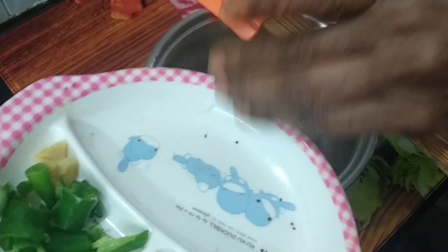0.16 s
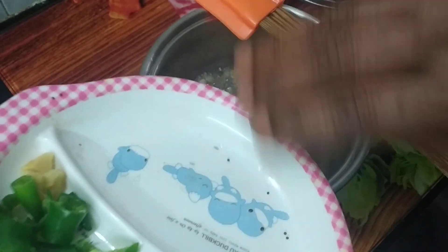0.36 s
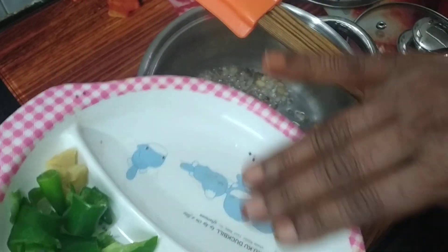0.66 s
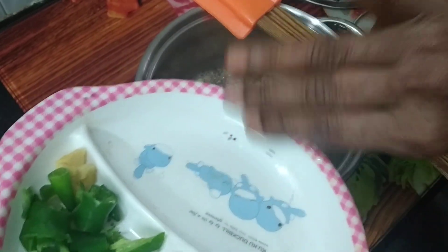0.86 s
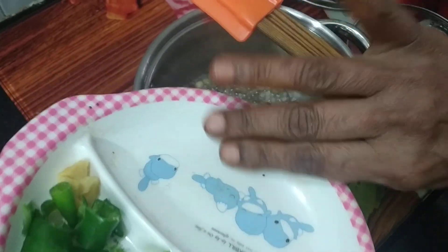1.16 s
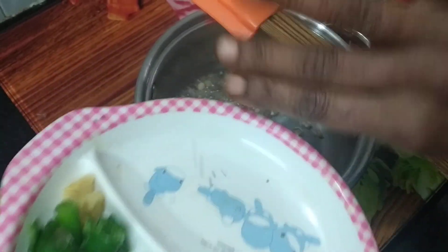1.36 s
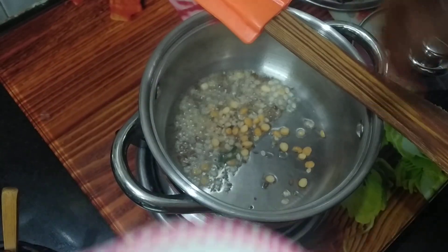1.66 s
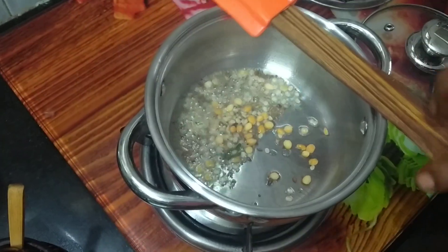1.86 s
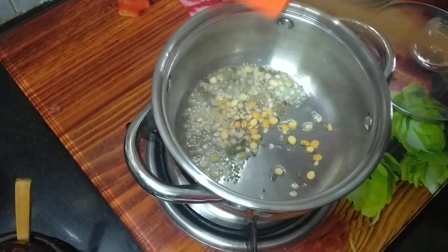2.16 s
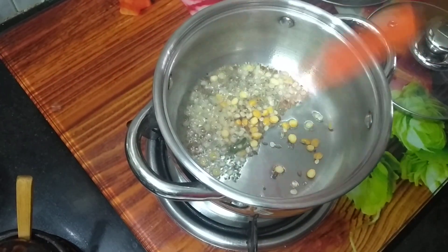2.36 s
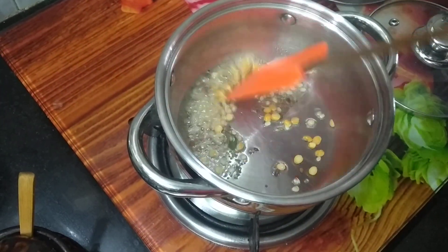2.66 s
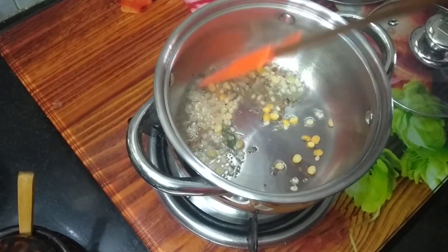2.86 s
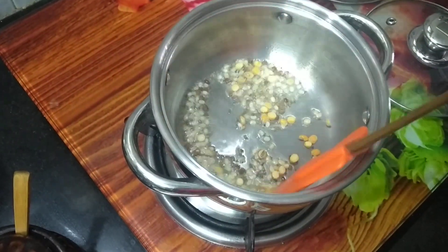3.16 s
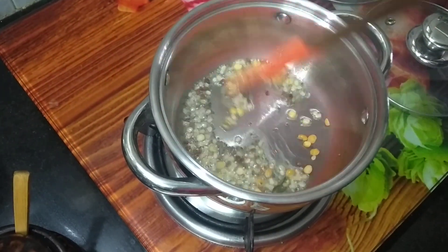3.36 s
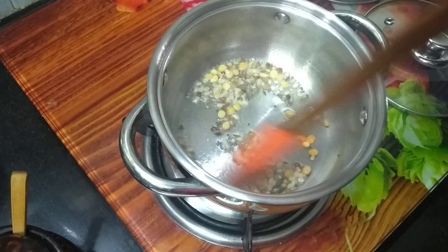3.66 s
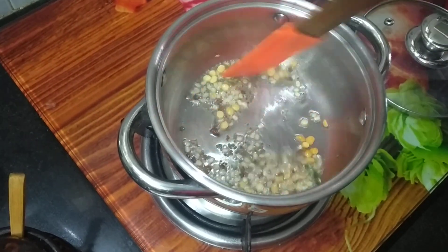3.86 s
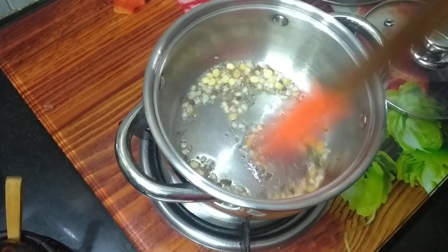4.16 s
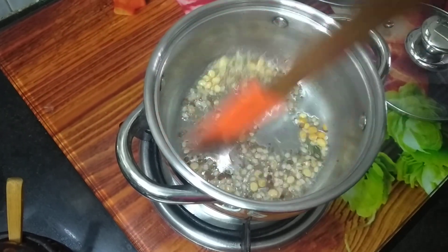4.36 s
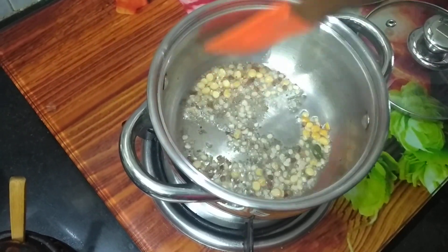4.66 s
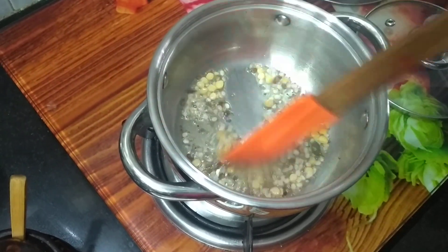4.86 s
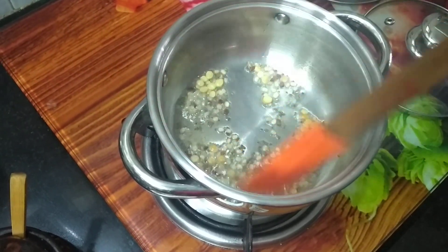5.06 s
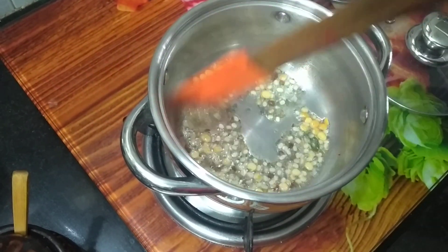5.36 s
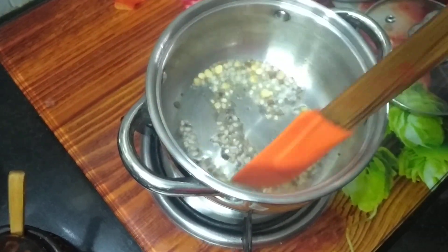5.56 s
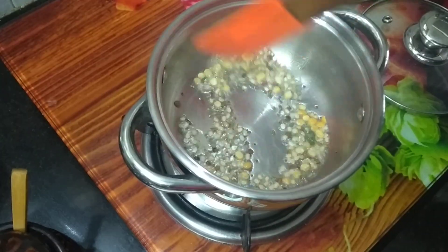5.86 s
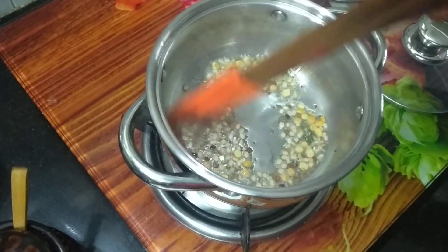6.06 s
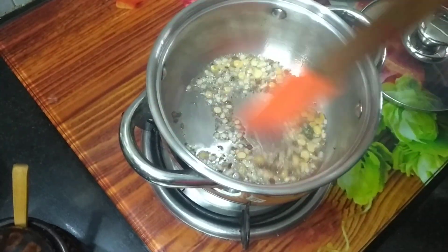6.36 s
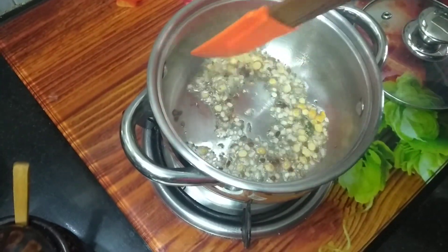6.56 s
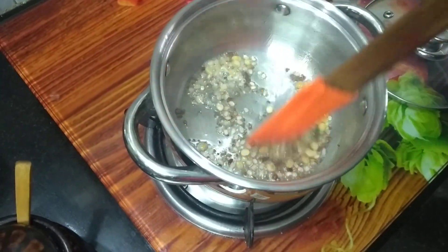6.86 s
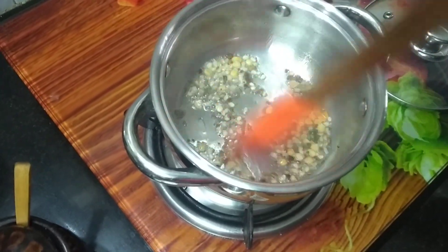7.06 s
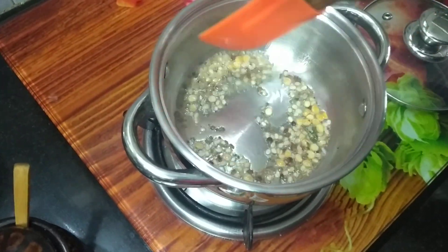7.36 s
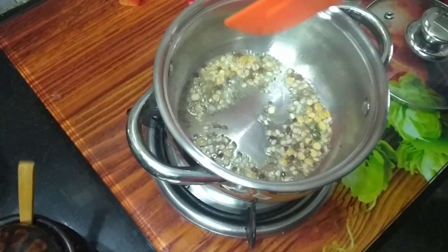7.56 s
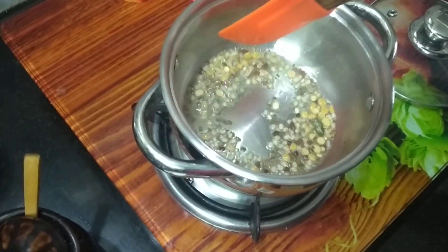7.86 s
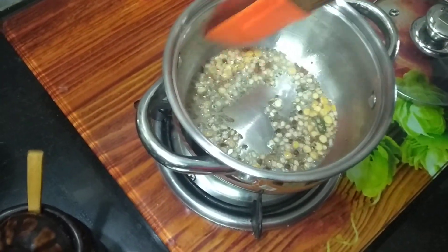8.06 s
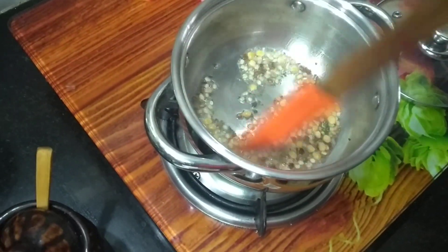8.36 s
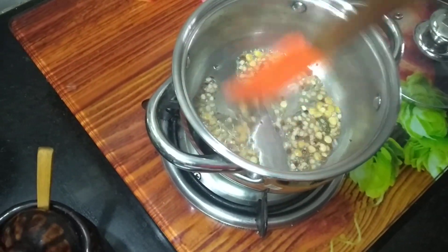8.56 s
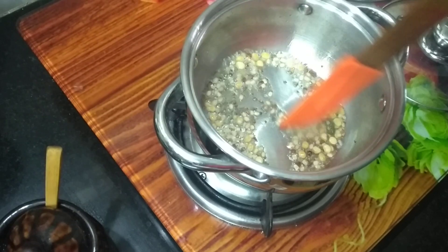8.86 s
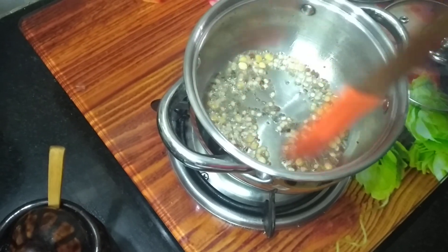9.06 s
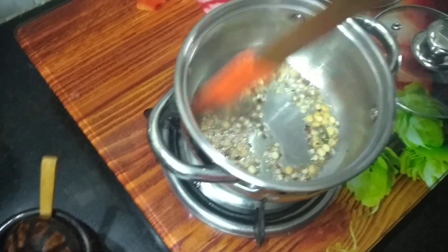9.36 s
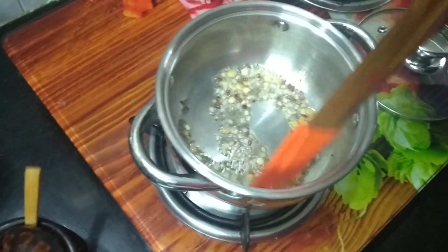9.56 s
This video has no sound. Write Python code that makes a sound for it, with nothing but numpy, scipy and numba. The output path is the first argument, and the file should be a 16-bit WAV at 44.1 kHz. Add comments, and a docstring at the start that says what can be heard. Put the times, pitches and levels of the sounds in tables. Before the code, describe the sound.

Seeds and lentils sizzle in hot oil in a steel pot, popping sharply and often while a spatula scrapes and knocks the metal.

```python
"""Seeds frying in a steel pot

Hot oil fizzes as dense random clicks and short pings; seeds burst as shaped noise cracks with a hissing tail.
A spatula scrapes the base in stick-slip clicks and knocks the wall, ringing the steel modes; loose seeds patter.
A plate squeaks once as a wavering tone, and a gas flame rumbles as low noise in the small hard-walled kitchen.
The microphones are close: gain control ducks after loud peaks, and the hardest cracks overload the input."""
import sys
import numpy as np
from scipy import signal
from scipy.fft import rfft, irfft
from scipy.io import wavfile
from scipy.ndimage import uniform_filter1d
from numba import njit

SR = 44100
rng = np.random.default_rng(int(sys.argv[2]) if len(sys.argv) > 2 else 0)


def dump(signal):
    """Clip the signal to [-1, 1] and save it as 16-bit WAV at the path in sys.argv[1]."""
    limited = np.clip(np.atleast_2d(signal).T, -1, 1)
    pcm = np.round(limited * 32767).astype(np.int16)
    wavfile.write(sys.argv[1], SR, pcm)


N = 428652
TIME = np.arange(N) / SR
TOP_HZ = 16000  # upper edge of the sound

# All table levels are relative: each layer adds its own trim.
# frying oil over time: [t/s, sizzle level/dB]
FRYING_LEVEL = [(0.1, -42), (0.71, -41), (1.36, -43), (1.54, -39.5), (2.29, -37), (2.8, -38), (3.39, -36),
                (3.63, -36), (4.56, -40), (5.34, -36.5), (5.96, -38.5), (6.54, -37), (6.73, -37),
                (7.72, -40.5), (8.09, -40), (8.28, -41), (9.32, -37.5), (9.7, -38)]
# the loudest bursting seeds: [t/s, crack level/dB, brightness f/Hz, lingering hiss level/dB]
SEED_BURSTS = [(0.001, -22, 9300, -11), (0.2093, -9.5, 7400, -9), (0.4011, -5.5, 7940, -3.5),
               (0.5816, -14, 8800, -27), (0.7135, -9, 8600, -8), (0.7356, -5, 7950, -6.5),
               (0.7635, -6, 8600, -6.5), (0.9511, -9.5, 9100, -7.5), (1.0367, -6.5, 7840, -7.5),
               (1.3395, -8, 7560, -7.5), (1.4595, -15, 9800, -21), (1.6115, 0, 11000, 0),
               (1.688, 0, 9000, -1.5), (1.8235, -12.5, 9400, -33), (1.8686, -10, 9300, -13),
               (2.0657, -9.5, 8160, -18), (2.083, -23, 9000, -22), (2.2211, -3, 9250, -20),
               (2.2446, -2, 10100, -3.5), (2.2965, -6.5, 9700, -29), (2.4255, -4.5, 8600, -26),
               (2.498, -19, 8950, -21), (2.7885, -13.5, 7460, -21), (2.8095, -17, 8500, -28),
               (2.8405, -5, 9000, -0.5), (2.8588, -4, 8000, -15), (3.0435, -8, 8800, -26),
               (3.2031, 0, 10100, 4.5), (3.2805, -20, 9500, -6), (3.3015, -7.5, 8200, -5),
               (3.329, -4, 9800, -22), (3.3751, -6, 9100, -22), (3.4296, -6.5, 8750, -6.5),
               (3.4445, -21, 9000, -22), (3.4545, -9, 8800, -25), (3.4835, -7, 11400, -16),
               (3.6848, -6.5, 7350, -6), (3.9275, -9, 9700, -29), (4.0041, -4, 8400, -14),
               (4.0185, -8, 8900, -5.5), (4.1652, -3.5, 8800, -5.5), (4.4215, -28, 9100, -27),
               (4.589, -6, 11100, -10), (4.6225, -3, 9200, -7.5), (4.8435, -13, 8360, -8.5),
               (4.859, -8, 9050, -20), (5.02, -15.5, 9000, -30), (5.0618, -5.5, 9300, -6.5),
               (5.1662, -6.5, 9700, -29), (5.2403, -9.5, 8650, -17), (5.2615, -7, 9200, -14),
               (5.3015, -10, 10900, -25), (5.3475, -13.5, 9300, -23), (5.53, -19, 9000, -29),
               (5.5975, -13, 8900, -27), (5.6275, -3.5, 7800, -7), (6.281, 0, 8800, -6),
               (6.2838, -3.5, 9000, -3.5), (6.372, -4.5, 9700, -3.5), (6.457, -13, 9500, -28),
               (6.4655, -10.5, 9300, -28), (6.5212, -7, 8300, -10), (6.6521, -8.5, 10000, -9),
               (6.659, -14, 9500, -16), (6.8155, -6, 5230, -39), (6.8605, -21, 8700, -30),
               (6.9485, -5.5, 10000, -5.5), (7.0, -3, 6800, -2.5), (7.212, -8, 10600, -19),
               (7.2315, -8.5, 10100, -27), (7.4763, -8, 8400, -11), (7.4931, -2, 8200, -15),
               (7.5407, -3, 9200, -35), (7.7095, -7.5, 10200, -21), (7.837, -2, 10600, -5.5),
               (7.8655, -6.5, 9200, -15), (8.0215, -17.5, 7900, -16), (8.1074, -5, 8300, -2),
               (8.1195, -5, 12900, -21), (8.4985, -8, 7200, -18), (8.594, -17, 9050, -27),
               (8.644, -20, 9700, -26), (8.7847, -6.5, 9000, -12), (8.9092, -5.5, 10200, -16),
               (8.9145, -4, 10200, -10), (9.0435, -11, 10100, -19), (9.0556, 1.5, 11100, -1.5),
               (9.0785, -11, 8500, -11), (9.2715, -6.5, 9900, -10), (9.3195, -13, 7240, -18),
               (9.3329, -1.5, 7250, -4.5), (9.4025, -1.5, 8100, -13), (9.4935, -2.5, 9760, -3.5),
               (9.526, -4.5, 8600, -25), (9.6662, -2.5, 6800, -7.5), (9.7005, -9, 9200, -9)]
# spatula strokes over the base: [t/s, level/dB, length of the push t/s, extra force of the landing level/dB]
SPATULA_STROKES = [(1.885, -37.5, 0.0051, 9.5), (1.907, -26.5, 0.0099, 2.5), (2.001, -26.5, 0.0034, 6),
                   (2.095, -29.5, 0.044, 3), (3.0307, -20, 0.008, 3), (3.162, -21.5, 0.0099, -5),
                   (3.523, -34, 0.0089, 5.5), (3.599, -26.5, 0.007, 4.5), (3.858, -21.5, 0.05, 6),
                   (4.031, -33.5, 0.046, 6), (4.273, -29.5, 0.044, 5), (4.365, -36, 0.0073, 4),
                   (4.724, -26.5, 0.006, 1.5), (4.859, -23, 0.0046, 8), (5.41, -32, 0.008, 3),
                   (6.046, -27.5, 0.008, 4.5), (6.107, -20.5, 0.018, 6), (6.674, -23.5, 0.033, 3),
                   (6.751, -33.5, 0.0075, 7), (6.867, -30.5, 0.02, 3.5), (8.143, -30.5, 0.02, 6),
                   (8.207, -24, 0.006, 2.5), (8.732, -23, 0.017, 0.5), (8.808, -29, 0.016, 2),
                   (8.853, -22.5, 0.0057, 1.5), (9.34, -20.5, 0.014, 7)]
# knocks on the pot wall: [t/s, blow level/dB, blow decay t/s, ring level/dB,
# chatter level/dB, chatter length t/s, chatter fade t/s, treble roll-off f/Hz]
WALL_KNOCKS = [(2.3718, 24, 0.012, 9.5, -15.5, 0.049, 0.002, 7100),
               (2.8585, 29.5, 0.0094, 19, -17, 0.081, 0.058, 2500),
               (3.2126, 20.5, 0.011, -20, -32, 0.068, 0.0055, 10900),
               (6.0886, 28.5, 0.013, 7, -4.5, 0.0084, 0.002, 1540),
               (6.098, 31, 0.0085, 6, -1.5, 0.027, 0.014, 1850)]
# seeds pattering on the steel: [t/s, level/dB, settling t/s, spectral peak f/Hz]
SEED_PATTERS = [(0.714, -21, 0.0065, 3950), (0.7355, -28, 0.03, 3950), (3.215, -22.5, 0.029, 3630),
                (6.674, -46, 0.048, 3570), (9.34, -28, 0.028, 4230)]
# pattering spectrum: [multiple of the peak frequency, level/dB per Hz]
PATTER_SPECTRUM = [(0.12, -26), (0.33, -21), (0.435, -1.5), (0.57, -11.5), (0.8, -6), (1, 4), (1.2, -4),
                   (1.5, -15), (4, -23)]
# modes of the steel pot: [f/Hz, 60 dB decay t/s, level/dB when the base is scraped, level/dB when the wall is struck]
POT_MODES = [(279.2, 0.17, 0, -6), (330, 0.15, 2, -6), (404, 0.1, 5, -1.5), (644, 0.097, -0.5, -20),
             (677.5, 0.22, 3, -19), (845, 0.1, -3.5, -20), (898, 0.15, -1, 3), (1055, 0.12, -23, 7.5),
             (1150, 0.25, -23, -4), (1170, 0.56, -17, -0.5), (1160, 0.039, -24, 19.5),
             (1260, 0.079, -7, -19), (1414, 0.064, -7.5, 4), (1530, 0.075, -19, 2), (1720, 0.091, -11, 6),
             (2220, 0.15, -37, -17), (2520, 0.17, -37, 1), (2520, 0.027, -5, -1), (2644, 0.048, 2.5, -12),
             (2750, 0.022, -2.5, -6), (3520, .06, -36, -18)]
# cracks that overload the microphones: [t/s, left jolt, right jolt (relative amplitude)]
INPUT_JOLTS = [(5.6288, 0, 0.79), (6.8165, 0.55, 1), (6.949, 0.05, 0.19), (7.5411, 0.6, 0.014),
               (9.4028, 1, 0.74), (9.4941, 0.15, 0.18), (9.5249, 0.26, 0.024), (9.667, 0, 1)]
# spectrum of the frying oil: [f/Hz, level/dB per Hz]
SIZZLE_SPECTRUM = [(700, -0.5), (1500, -5), (3000, -3), (5000, 1), (7000, 7), (8500, 12), (9600, 14.5),
                   (11500, 10), (13500, 7.5), (16000, -1)]
# spectrum of a splitting husk, before its brightness tilt: [f/Hz, level/dB per Hz]
CRACK_SPECTRUM = [(30, -12), (200, -7.5), (800, -6.5), (2000, -11), (4000, -1.5), (6500, 6.5), (9000, 15),
                  (12000, 10), (16000, 6.5)]
# broad resonances of the scraped base: [f/Hz, level/dB per Hz]
SCRAPE_SPECTRUM = [(30, -27), (100, -5.5), (200, -5.5), (350, 7), (550, -0.5), (880, 12), (1150, -6.5),
                   (1500, -6), (2100, -12), (2700, -2), (3200, -11), (4500, -9.5), (9000, -0.5),
                   (16000, -32)]
# spectrum of the spatula against the wall: [f/Hz, level/dB per Hz]
CLACK_SPECTRUM = [(40, -27), (200, -3), (600, -1.5), (1050, 7), (1500, 3), (1950, 3.5), (2400, 4.5),
                  (4000, 2.5), (9000, 11), (16000, 6.5)]
# spectrum of the gas flame: [f/Hz, level/dB per Hz]
STOVE_SPECTRUM = [(20, 9), (35, -4.5), (50, -20), (75, 2.5), (105, -6.5), (145, 2), (200, -9.5),
                  (300, -0.5), (390, -12), (480, 2.5), (600, -11), (1000, -18.5), (2000, -26), (5000, -22)]

# smaller seeds burst at random, more often the harder the oil fries
STRAY_PER_S, STRAY_DB, STRAY_SPREAD_DB, STRAY_HZ, STRAY_HISS_DB = 6.7, -33, 8.5, 8600, -15
# a light stroke is brighter than a hard one, which presses the blade flat (edge dB at 0 dB force, dB per dB)
EDGE_DB, EDGE_SLOPE = -7.5, 0.83


def undb(db):
    """Decibels to gain."""
    return 10 ** (np.asarray(db) / 20)


def unit(x):
    """Scale to rms 1."""
    return x / np.sqrt(np.mean(x ** 2))


def decay(t, t60):
    """Fade by 60 dB over t60 seconds."""
    return np.exp(-np.log(1000) * t / t60)


def add(track, s, sound):
    """Mix a sound into a track from time s on."""
    i = max(int(s * SR), 0)
    track[..., i:i + sound.shape[-1]] += sound[..., :max(N - i, 0)]


def convolve(x, response):
    """Pass a sound through an impulse response, keeping its length."""
    return signal.fftconvolve(np.atleast_2d(x), np.atleast_2d(response), axes=-1)[:, :x.shape[-1]]


def colour(x, points, size=4096):
    """Causal filter of unit energy that follows (Hz, dB) points."""
    hz, db = np.transpose(points)
    bins_hz = np.arange(size // 2 + 1) * SR / size
    gain = undb(np.interp(np.log(bins_hz + 1), np.log(hz), db))
    # folding the cepstrum gives minimum phase
    cepstrum = irfft(np.log(gain))
    cepstrum[1:size // 2] *= 2
    cepstrum[size // 2 + 1:] = 0
    response = irfft(np.exp(rfft(cepstrum)))
    return convolve(x, response / np.linalg.norm(response))


def lowpass(x, hz):
    """Gentle treble roll-off."""
    return signal.lfilter(*signal.butter(1, min(hz, TOP_HZ), fs=SR), x)


def walk(rate):
    """Smooth random wander with a spread near 1, taking a new direction rate times a second."""
    k = int(SR / rate)
    steps = np.repeat(rng.standard_normal(N // k + 1), k)
    return unit(uniform_filter1d(steps, k)[:N])


def clicks(rate, spread_db, largest_db):
    """Randomly timed impulses, rate per second, many small and a few large."""
    size = undb(np.minimum(spread_db * rng.exponential(size=N), largest_db))
    struck = rng.random(N) < rate / SR
    return unit(struck * size * rng.choice([-1, 1], N))


def grains(rate, lo_hz, hi_hz, cycles, spread_db, size=512):
    """Tiny pings at random moments, each with its own pitch and strength, and its own phase at each microphone."""
    chance = rng.random((4000, 5))[:int(np.clip(rate * N / SR, 1, 4000))]
    when, pitch, strength, *phases = chance.T[..., None]
    hz, t = lo_hz * (hi_hz / lo_hz) ** pitch, TIME[:size]
    envelope = undb(spread_db * strength ** 2) * np.exp(-t * hz / cycles)
    at = ((when * (N - size)).astype(int) + np.arange(size)).ravel()
    channels = []
    for phase in phases:
        pings = envelope * np.sin(2 * np.pi * (hz * t + phase))
        channels.append(np.bincount(at, pings.ravel(), N))
    return unit(np.array(channels))


def ports(pair, alike):
    """Blend two unrelated signals into left and right with a given correlation."""
    alike = np.clip(alike, -1, 1)
    mid = np.sqrt((1 + alike) / 2) * pair[0]
    side = np.sqrt((1 - alike) / 2) * pair[1]
    return np.array([mid + side, mid - side])


def diffuse(pair, part_hz=1100):
    """Sound from all around: the close microphones share its bass but not its treble."""
    side = pair[1] - lowpass(pair[1], part_hz)
    return np.array([pair[0] + side, pair[0] - side]) / np.sqrt(2)


def kitchen(x, t60=0.28, build_s=0.0004):
    """Diffuse echo of the hard-walled room: noise that builds quickly and dies away."""
    t = TIME[:SR]
    build = 1 - np.exp(-(t / build_s) ** 2)
    tail = diffuse(rng.standard_normal((2, SR))) * decay(t, t60) * build
    return convolve(x, tail / np.linalg.norm(tail[0]))


def pot(force, mode_db, part_hz=3200):
    """The steel rings in its modes; the higher ones reach the two microphones further out of phase."""
    t, ring = TIME[:SR // 3], 0
    for (hz, t60, _, _), db in zip(POT_MODES, mode_db):
        offset = min(hz / part_hz, 1) * rng.choice([-1, 1]) * np.array([[1], [-1]])
        tone = np.sin(2 * np.pi * hz * t + offset)
        ring = ring + rng.choice([-1, 1]) * undb(db) / np.sqrt(t60) * decay(t, t60) * tone
    ring = ring * (1 - np.exp(-t / 0.00072))  # the blow takes a moment to spread round the wall
    return convolve(force, ring / np.linalg.norm(ring[0]))


def sizzle(level_db=0.5, tick_db=-7, room_db=-6):
    """Countless steam bubbles merge into an even fizz; a few larger ones tick as they burst."""
    surge_db = 0.4 * walk(12)
    heat = undb(np.interp(TIME, *np.transpose(FRYING_LEVEL)) + level_db + surge_db)
    bubbles = np.array([clicks(14000, 2.5, 9) for _ in range(2)])
    ticks = grains(rate=300, lo_hz=6000, hi_hz=15000, cycles=4.5, spread_db=18)
    oil = colour(bubbles + undb(tick_db) * ticks, SIZZLE_SPECTRUM) * heat
    return oil + undb(room_db) * kitchen(oil)


def stray_seeds():
    """Small bursts, likelier where the oil fries harder: rows of (s, crack dB, brightness Hz)."""
    chance = rng.random((200, 3))[:int(np.clip(STRAY_PER_S * N / SR, 0, 200))]
    fried = np.cumsum(undb(np.interp(TIME, *np.transpose(FRYING_LEVEL))) ** 2)
    bursts = []
    for when, size, husk in chance:
        s = np.interp(when, fried / fried[-1], TIME)
        db = STRAY_DB + STRAY_SPREAD_DB * (2 * size - 1)
        bursts.append((s, db, STRAY_HZ * 2 ** ((husk - .5) / 2)))
    return bursts


def seeds(level_db=6.0, hiss_db=0.0, split_db=4.5, hiss_t60=0.27, rise_s=0.0005, snap_s=0.0012,
          rattle_s=0.009, rattle_db=-16, lag_s=0.00046, tilt=2.08, tilt_from_hz=2200):
    """Each husk splits in an instant; the crack rattles between the pot walls and leaves a hiss of steam and echo."""
    direct, spill = np.zeros((2, 2, N))
    t = TIME[:1024]
    shape = (1 - np.exp(-t / rise_s)) * (np.exp(-t / snap_s) + undb(rattle_db) * np.exp(-t / rattle_s))
    small = [(s, db, hz, db + STRAY_HISS_DB) for s, db, hz in stray_seeds()]
    for s, db, hz, tail_db in list(SEED_BURSTS) + small:
        burst = rng.standard_normal((2, len(t))) * shape
        # the split itself reaches each microphone at a slightly different moment
        burst[[0, 1], rng.integers(8, 12, 2)] += undb(split_db) * 2
        # small husks crack brighter than large ones
        slope_db = 20 * tilt * np.log10(hz / 9200)  # per octave
        spectrum = [(f, d + slope_db * np.log2(max(f, tilt_from_hz) / 9200)) for f, d in CRACK_SPECTRUM]
        crack = colour(burst, spectrum, size=512)
        crack *= undb(level_db) * 2 / np.linalg.norm(crack, axis=1, keepdims=True)
        place = undb(0.66 * rng.standard_normal() * np.array([[1], [-1]]))  # anywhere in the oil
        add(direct, s + lag_s, crack * undb(db) * place)
        add(spill, s + lag_s, crack * undb(tail_db + hiss_db))
    return direct + kitchen(spill, t60=hiss_t60)


def scrapes(level_db=-1.5, ring_db=-6, grit_db=-1.46, rattle_db=-12, room_db=-2.5,
            attack_s=0.00027, release_s=0.026, touch_db=20, spot_db=2.0, landing_s=0.013,
            soft_hz=480, edge_hz=1700, shift=0.017):
    """The blade lands with a bump, then sticks and slips, rattling lentils; each push starts hard, holds and fades."""
    sound = np.zeros((2, N))
    t = TIME[:SR // 2]
    slips = np.array([clicks(700, 3, 10) for _ in range(2)])
    soft, sharp = lowpass(slips, soft_hz), slips - lowpass(slips, edge_hz)
    lentils = diffuse(grains(rate=170, lo_hz=550, hi_hz=3000, cycles=3, spread_db=12))
    for s, db, hold_s, landing_db in SPATULA_STROKES:
        span = (int(s * SR) + np.arange(len(t))) % N
        push = (1 - np.exp(-t / attack_s)) * np.exp(-np.maximum(t - hold_s, 0) / release_s)
        push = push * undb(landing_db * np.exp(-t / landing_s))
        touch = lowpass((t == 0) * undb(db + landing_db + touch_db), 4500)
        slip = undb(db) * soft[:, span] + undb(EDGE_DB + EDGE_SLOPE * db) * sharp[:, span]
        force = push * slip + touch
        # each spot on the base favours other modes, and the pressing blade shifts the broad resonances
        mode_db = np.array([m[2] for m in POT_MODES]) + spot_db * rng.standard_normal(len(POT_MODES))
        body = [(hz * np.exp(shift * np.tanh(rng.standard_normal())), d) for hz, d in SCRAPE_SPECTRUM]
        ring = undb(ring_db) * pot(force[0], mode_db)
        grit = undb(grit_db) * colour(diffuse(force), body)
        rattle = undb(db + rattle_db) * push * lentils[:, span]
        add(sound, s, ring + grit + rattle)
    return undb(level_db) * (sound + undb(room_db) * kitchen(sound))


def knocks(ring_db=-2.5, clack_db=0, room_db=-10, rough_db=2, rub_db=-4):
    """The spatula hits the wall: a clack, then uneven chatter that keeps the steel ringing until the slide stops."""
    strike, contact = np.zeros(N), np.zeros((2, N))
    t = TIME[:SR // 4]
    for s, blow_db, blow_s, free_db, chatter_db, chatter_s, stop_s, hz in WALL_KNOCKS:
        blow = diffuse(rng.standard_normal((2, len(t)))) * np.exp(-t / blow_s)
        blow = lowpass(blow / np.linalg.norm(blow[0]), hz)  # the soft blade cushions the first contact
        roughness = unit(undb(rough_db * walk(263)))[:len(t)]
        slide = (1 - np.tanh((t - chatter_s) / stop_s)) / 2 * roughness
        chatter = diffuse(rng.standard_normal((2, len(t)))) * slide
        add(contact, s, lowpass(undb(blow_db) * blow + undb(chatter_db) * chatter, hz))
        rub = undb(rub_db) * chatter[0] / np.linalg.norm(chatter[0])
        add(strike, s, undb(free_db) * ((t == 0) + rub))
    clack = undb(clack_db) * colour(contact, CLACK_SPECTRUM)
    ring = undb(ring_db) * pot(strike, [m[3] for m in POT_MODES])
    return clack + undb(room_db) * kitchen(clack) + ring


def patters():
    """Loose seeds, dropped from the plate or flung by the blade, bounce on the steel and settle."""
    sound = np.zeros((2, N))
    t = TIME[:SR // 2]
    impacts = diffuse(np.array([clicks(600, 2.5, 8) for _ in range(2)]))
    for s, db, settle_s, hz in SEED_PATTERS:
        span = (int(s * SR) + np.arange(len(t))) % N
        bounces = impacts[:, span] * np.exp(-t / settle_s)
        spectrum = [(ratio * hz, d) for ratio, d in PATTER_SPECTRUM]
        add(sound, s, undb(db) * colour(bounces, spectrum))
    return sound


def plate(rub_db=-55, rub_hz=1700, sag_hz_per_s=250, waver_hz=35, rasp_db=1, break_db=5):
    """A fingertip sweeping a plastic plate squeaks faintly and brokenly, sagging as it slows."""
    rub_at_s, rub_s = 0.86, 0.1
    pitch = rub_hz - sag_hz_per_s * (TIME - rub_at_s) + waver_hz * walk(130)
    tone = np.sin(2 * np.pi * np.cumsum(pitch) / SR)
    squeak = unit(tone * undb(break_db * walk(90)))
    noise = diffuse(rng.standard_normal((2, N)))
    rasp = unit(signal.lfilter(*signal.iirpeak(rub_hz, 5, fs=SR), noise))
    press = np.exp(-((TIME - rub_at_s) / rub_s) ** 2)
    return undb(rub_db) * (squeak + undb(rasp_db) * rasp) * press


def stove(level_db=-45, flutter_db=1.92):
    """The gas flame's soft rumble: low noise, nearly alike on both sides, with a light flutter."""
    flame = colour(ports(rng.standard_normal((2, N)), alike=0.9), STOVE_SPECTRUM)
    return flame * undb(level_db + flutter_db * walk(21))


def scene():
    """Everything in, over and under the pot."""
    return sizzle() + seeds() + scrapes() + knocks() + patters() + plate() + stove()


@njit
def follow(x, release):
    """Peak follower: jumps up at once and sinks slowly."""
    out, e = np.empty(len(x)), 0.
    for i in range(len(x)):
        e = max(x[i], e * release)
        out[i] = e
    return out


def overload(recover_s=0.11, settle_s=0.15, rebound=0.54, coupling_hz=0.34, level_db=-9.0, spike=1.44):
    """An overloaded input spikes, falls off centre, creeps back past the middle and settles."""
    offset = np.zeros((2, N))
    creep = np.interp(TIME[:SR], [0, recover_s, recover_s + settle_s], [-1, rebound, 0])
    swing = np.concatenate([spike * np.hanning(14), creep])
    for s, left, right in INPUT_JOLTS:
        add(offset, s, np.outer([left, right], swing))
    coupling = signal.butter(2, coupling_hz, "high", fs=SR, output="sos")
    return undb(level_db) * signal.sosfilt(coupling, offset)


def record(dry, knee_db=-11, release_s=0.047, react_s=0.001, squeeze=0.62):
    """Gain control ducks just after loud peaks; the input overloads and clips; the top is cut."""
    peak = follow(np.abs(dry).max(axis=0), np.exp(-1 / (release_s * SR)))
    excess_db = np.maximum(20 * np.log10(peak + 1e-9) - knee_db, 0)
    duck_db = lowpass(squeeze * excess_db, 1 / (2 * np.pi * react_s))
    sound = np.clip(dry * undb(-duck_db) + overload(), -1, 1)
    return signal.sosfilt(signal.ellip(8, .2, 70, TOP_HZ, fs=SR, output="sos"), sound)


dry = scene()
out = record(dry)
dump(out)
```